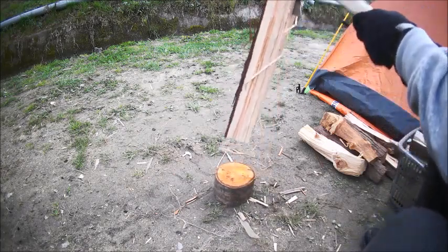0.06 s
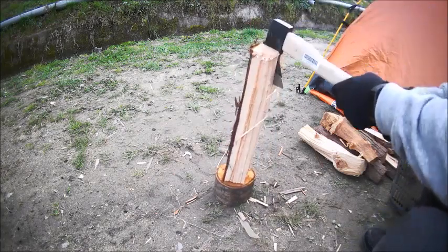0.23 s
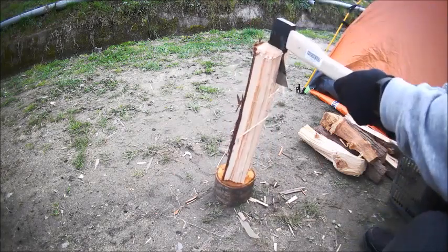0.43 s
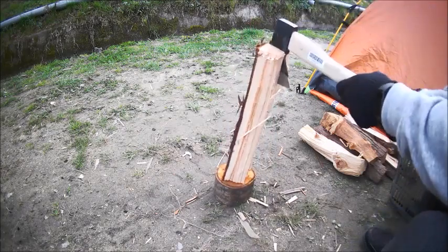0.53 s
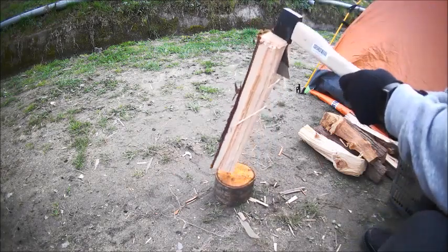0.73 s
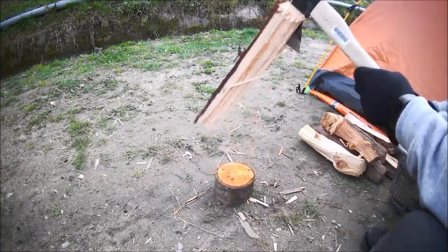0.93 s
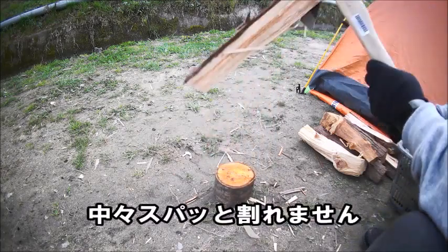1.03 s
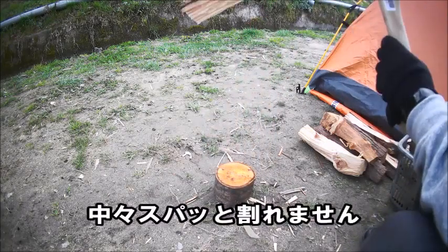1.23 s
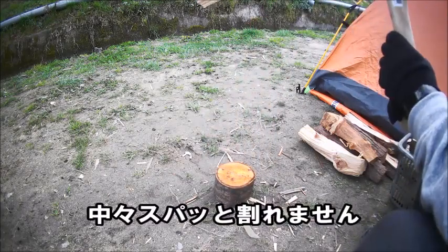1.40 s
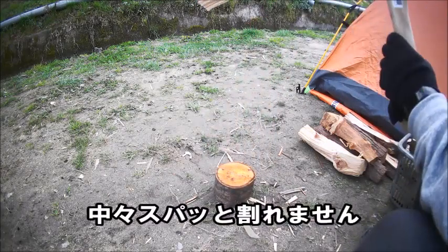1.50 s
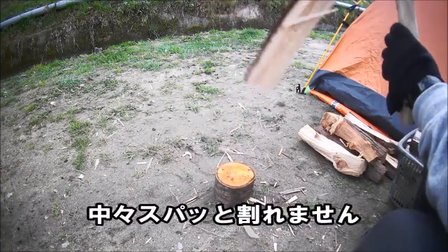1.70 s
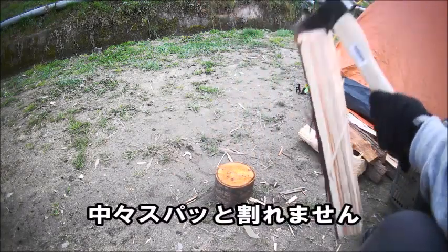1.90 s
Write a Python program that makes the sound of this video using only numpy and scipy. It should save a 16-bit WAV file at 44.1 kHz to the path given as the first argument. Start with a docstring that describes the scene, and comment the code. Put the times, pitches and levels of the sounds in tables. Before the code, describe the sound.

A log wedged on a hatchet slams once onto a wooden block, a loud dry crack slightly clipping the close microphone, with a short open-air scatter; later faint ticks, cloth rustles and a tiny squeak over soft hush.

```python
"""A log with a hatchet stuck in it is slammed once on a wooden block, close enough to clip the microphone
input. Brief contacts excite dying sines of wood and steel, and fibres splinter in a burst of shaped noise. Tent
and trees of an open campsite scatter the blow back as random reflections that die away. Air whistles faintly
before the blow; wood ticks, rustles of ringing clicks and stick-slip creaks of the wedged blade lie over a soft
outdoor hush of drifting noise."""
import sys
import numpy as np
from scipy import signal
from scipy.fft import rfft, irfft
from scipy.io import wavfile
from scipy.ndimage import uniform_filter1d

SR = 44100
rng = np.random.default_rng(int(sys.argv[2]) if len(sys.argv) > 2 else 0)


def output_pcm(signal):
    """Save a mono or channel-first signal as 16-bit PCM at the path in sys.argv[1].

    Samples are clipped to [-1, 1] before scaling.
    """
    pcm = np.clip(np.atleast_2d(signal).T, -1, 1) * 32767
    wavfile.write(sys.argv[1], SR, np.round(pcm).astype(np.int16))


def voltage_ratio(decibels):
    """Convert decibels (scalar or array-like) to amplitude ratios, 20 dB per decade."""
    exponent = np.asarray(decibels, float) / 20
    return 10 ** exponent


N = 85995  # length in samples

# Contacts within the blow; short ones reach the high modes.
# Each row: start in seconds, push (pulse area) in dB, contact time in ms.
BLOW_CONTACTS = [(.2166, -4, .9), (.2181, 3, 0.21), (.2196, -1.5, .12), (.2204, -6.5, 0.09)]


def evened(x):
    """Scales to rms 1."""
    return x / np.sqrt(np.mean(x ** 2) + 1e-20)


def read(points, hz):
    """Reads a spectrum table on a log frequency axis."""
    f, value = np.transpose(points)
    return np.interp(np.log(hz + 1), np.log(f + 1), value)


def add(mix, s, sound):
    """Mixes a sound in at a time in seconds, cut off at the end of the mix."""
    part = mix[round(s * SR):][:len(sound)]
    part += sound[:len(part)]


def ring(modes):
    """Sum of dying sines, one for each mode of a struck body."""
    t = np.arange(SR // 2) / SR
    return sum(voltage_ratio(db - 60 * t / t60) * np.sin(2 * np.pi * hz * t) for hz, db, t60 in modes)


def resonate(x, hz, width_hz):
    """A two-pole resonance of gain 1 at its peak."""
    return signal.lfilter(*signal.iirpeak(min(hz, SR / 2.2), hz / width_hz, SR), x)


def contact_force():
    """The log lands, then the blade drives in from the other end: the first push has the opposite sign."""
    t, force = np.arange(N) / SR, np.zeros(N)
    for k, (s, db, ms) in enumerate(BLOW_CONTACTS):
        u = np.clip((t - s) * 1000 / ms, 0, 1)
        pulse = np.sin(np.pi * u) ** 2
        direction = 1 if k else -1
        force += direction * voltage_ratio(db) * pulse / pulse.sum()
    return force


def splinter():
    """Tearing fibres: shaped noise that swells quickly and dies away."""
    # Spectrum of the tearing. Each row: frequency in Hz, relative level in dB.
    tearing = [(1500, -11), (3000, 1.5), (6000, -6), (9000, 1), (12000, -10.5), (16000, -27.5)]
    level_db, rise_s, t60_s = -15, .0018, .013
    t = np.arange(2048) / SR
    spectrum = rfft(rng.standard_normal(2048)) * voltage_ratio(read(tearing, np.fft.rfftfreq(2048, 1 / SR)))
    hiss = evened(irfft(spectrum))
    return hiss * np.minimum(t / rise_s, 1) ** 2 * voltage_ratio(level_db - 60 * t / t60_s)


def blow():
    """The contact force rings the modes of wood and steel, and fibres splinter."""
    # Modes of the log. Each row: frequency in Hz, relative level in dB, t60 in seconds before the choke.
    wood_modes = [(245, -19, .07), (415, -10, 0.034), (620, -14, .025), (780, -8, .03), (1365.3, 2, 0.015),
                  (1963, -15.5, .018), (2292, -5.5, 0.018), (2712.4, -0.5, 0.014), (3450, 1.5, 0.011),
                  (3682, -3.5, .018), (4830, -17, 0.013), (6500, -20, .01), (7000, -12, 0.011),
                  (8600, -13, 0.015), (11100, -11, .008)]
    # Modes of the hatchet head. Each row: frequency in Hz, level in dB, t60 in seconds.
    steel_modes = [(4994, -29, .11), (8790, -43, .17)]
    wood_db, splinter_s = -0.5, .2172
    choke_s, choke_db, choke_length_s = .2214, -7, .0012
    t, force = np.arange(N) / SR, contact_force()
    # the log seats on the block and its ring is damped
    choke = np.clip((t - choke_s) / choke_length_s, 0, 1)
    wood = signal.oaconvolve(force, ring(wood_modes))[:N] * voltage_ratio(wood_db + choke_db * choke)
    # a small log radiates little below 190 Hz
    wood = signal.lfilter(*signal.butter(2, 190, "high", fs=SR), wood)
    steel = signal.oaconvolve(force, ring(steel_modes))[:N]
    out = wood + steel
    add(out, splinter_s, splinter())
    return out


def sideways_blow(chop):
    """What leaves sideways towards tent and trees: a plain crack with a little of the ring."""
    ring_db, crack_db = -22, 22
    sideways = voltage_ratio(ring_db) * chop
    add(sideways, BLOW_CONTACTS[1][0], voltage_ratio(crack_db) * np.ones(1))  # a single-sample impulse
    return sideways


def surroundings(x):
    """Random reflections whose strength follows delay and whose spectrum's edges dull with distance."""
    # Strength of the scattered sound. Each row: delay in seconds, level in dB.
    strength = [(.006, -33), (0.013, -32), (0.025, -28), (0.034, -28), (0.045, -36), (.068, -50),
                (.085, -45), (.1, -47), (.11, -55), (.128, -49), (.15, -54), (.185, -61), (.212, -58),
                (.23, -64), (.27, -69), (0.359, -84)]
    # Change of its spectrum with delay. Each row: frequency in Hz, slope in dB per second.
    dulling = [(200, -40), (1000, -8.5), (2500, 10), (5000, -10), (8000, -10), (11000, -40)]
    # Its spectrum at no delay. Each row: frequency in Hz, relative level in dB.
    tone = [(100, -28), (350, -11), (700, -8), (1400, -2), (2700, -7), (4300, -16), (7500, -27),
            (9500, -34), (12000, -56)]
    taps = np.zeros(SR // 2)
    slots = np.arange(0, len(taps) - 20, 20)
    # one reflection of random sign somewhere in each slot of 20 samples
    taps[slots + rng.integers(0, 20, len(slots))] = rng.choice([-1., 1.], len(slots))
    hz, t, z = signal.stft(taps, SR, nperseg=128)
    z = z * voltage_ratio(read(tone, hz)[:, None] + read(dulling, hz)[:, None] * t)
    tail = signal.istft(z, SR, nperseg=128)[1][:len(taps)]
    s, db = np.transpose(strength)
    fade = voltage_ratio(np.interp(np.arange(len(taps)) / SR, s, db, -120, -120))
    return signal.oaconvolve(x, tail * fade)[:N]


def creak(start, length, db, first_hz, last_hz):
    """The blade in the split slips fast: a gliding tone with overtones, friction hiss and a short ring."""
    # Level in dB of each harmonic of the slip, from the fundamental up.
    harmonic_db = [-5, -18, -42, -30]
    ring_db, ring_width_hz, hiss_db, hiss_hz = -10, 80, -19, 5500
    u = np.minimum(np.arange(2000) / SR / length, 1)
    turn = 2 * np.pi * np.cumsum(first_hz + (last_hz - first_hz) * u) / SR
    slip = sum(voltage_ratio(h) * np.sin((k + 1) * turn) for k, h in enumerate(harmonic_db))
    hiss = resonate(rng.standard_normal(2000), hiss_hz, hiss_hz)
    hiss = resonate(hiss, hiss_hz, hiss_hz) * voltage_ratio(hiss_db)
    stroke = np.sin(np.pi * u ** .55) ** 1.5  # peaks before the middle
    sound = (slip + hiss) * voltage_ratio(db) * stroke
    return start, sound + voltage_ratio(ring_db) * resonate(sound, last_hz, ring_width_hz)


def tick(s, db, hz, width_hz, t60, noisy):
    """One small knock of wood: a dying tone blended with a puff of noise around it."""
    snap_db = 16  # push of the first sample, against noise of rms 1
    t, noisy = np.arange(3000) / SR, np.clip(noisy, 0, 1)
    push = rng.standard_normal(len(t)) + voltage_ratio(snap_db) * (t == 0)
    puff = evened(resonate(resonate(push, hz, width_hz), hz, width_hz)) / 2
    tone = np.sin(2 * np.pi * hz * t)
    return s, voltage_ratio(db - 60 * t / t60) * ((1 - noisy) * tone + noisy * puff)


def rustle(start, length, db, low_hz, high_hz):
    """Uneven clicks, each ringing one of several small resonances, under a soft stroke."""
    # Level in dB of each grain resonance, from lowest to highest.
    grain_level_db = [-1, -0.5, -0.5, -1.5, -2.5, -2.5, -4.5, -5.5]
    clicks_per_s, uneven_db, width_hz = 5000, 4, 260
    draw, t = rng.random((3, 4000)), np.arange(4000) / SR
    place = np.linspace(0, 1, len(grain_level_db))
    which = rng.integers(0, len(place), 4000)
    happens, sign = draw[0] < clicks_per_s / SR, np.sign(draw[1] - .5)
    clicks = happens * sign * voltage_ratio(-uneven_db * np.log(draw[2] + .01))
    hz = low_hz * (high_hz / low_hz) ** place * rng.uniform(.94, 0.98, len(place))
    grains = sum(voltage_ratio(grain_level_db[k]) * resonate(clicks * (which == k), f, width_hz)
                 for k, f in enumerate(hz))
    stroke = np.sin(np.pi * np.minimum(t / length, 1)) ** 1.1
    return start, voltage_ratio(db) * evened(grains) * stroke


def swing():
    """Air whistles faintly past the falling log: noise in a narrow resonance that climbs."""
    # Each row: time in seconds, frequency in Hz, rms level in dB.
    whistle = [(.07, 1233, -83), (.11, 1450, -70), (.15, 1540, -69), (.19, 1594, -68), (.212, 1617, -79.5)]
    width_hz = 22
    s, hz, db = np.transpose(whistle)
    t, r = np.arange(N) / SR, np.exp(-np.pi * width_hz / SR)
    turn = np.exp(2j * np.pi * np.cumsum(np.interp(t, s, hz)) / SR)
    noise = rng.standard_normal(N) + 1j * rng.standard_normal(N)
    slow = signal.lfilter([1 - r], [1, -r], noise)
    return evened((turn * slow).real) * voltage_ratio(np.interp(t, s, db, -120, -120))


def hush():
    """Distant outdoor noise with drifting patches, a slow swell and faint wavering tones."""
    # Spectrum of the outdoor noise. Each row: frequency in Hz, relative level in dB per Hz.
    outdoor = [(18, -48.5), (30, -15), (134, -2), (247, -4.5), (362, -2.5), (455, -5), (999, -8.5),
               (2980, -23), (3300, -27), (12000, -31.5), (13000, -35.5)]
    # Faint tones, made of narrow noise. Each row: frequency in Hz, rms level in dB, width in Hz.
    faint_tones = [(201, -74, 9.4), (5420, -92.5, 39)]
    level_db, patch_db, swell_db = -60.5, 1.6, .4
    frames, hz = N // 256 + 5, np.fft.rfftfreq(1024, 1 / SR)
    a, b, patches = rng.standard_normal((frames, 513, 3)).T
    patches = uniform_filter1d(patches, size=10, axis=0)  # across frequency
    patches = evened(uniform_filter1d(patches, size=12, axis=1))  # across time
    swell = evened(uniform_filter1d(rng.standard_normal(frames), size=30))
    z = (a + 1j * b) * voltage_ratio(read(outdoor, hz)[:, None] + patch_db * patches + swell_db * swell)
    out = voltage_ratio(level_db) * evened(signal.istft(z, nperseg=1024, noverlap=768)[1][:N])
    return out + sum(voltage_ratio(db) * evened(resonate(rng.standard_normal(N), f, w)) for f, db, w in faint_tones)


def scene():
    """All sources at one close microphone."""
    # Creaks of the blade. Each row: start in seconds, length in seconds, level in dB, first Hz, last Hz.
    creaks = [(1.7799, 0.0045, -21, 3330, 3450), (1.7819, 0.0082, -21, 2487, 2270),
              (1.7857, 0.00403, -27, 3665, 4050), (1.8014, 0.0043, -45.5, 2400, 2390)]
    # Ticks of wood. Each row: start in seconds, level in dB, ring in Hz,
    # width of the puff's resonances in Hz, t60 in seconds, share of noise from 0 to 1.
    ticks = [(0.1825, -42, 1550, 5000, .035, 0.36), (.386, -56.5, 6500, 3980, 0.036, 0.71),
             (0.797, -52.5, 5500, 6000, 0.01, .9), (.917, -55.5, 2980, 4990, .02, 0.91),
             (1.0486, -40, 1900, 2800, .016, .9), (1.6032, -53, 4800, 6000, 0.044, .9),
             (1.7687, -39.5, 1342, 2020, 0.022, 0.61), (1.8352, -50, 5000, 7000, .045, 0.98)]
    # Rustles and scrapes. Each row: start in seconds, length in seconds,
    # rms level in dB before the stroke, nominal lowest and highest resonance in Hz.
    rustles = [(0.191, 0.015, -61.5, 2530, 9000), (.48, .032, -56, 2200, 11500),
               (0.621, 0.049, -72.5, 2500, 8010), (1.216, 0.026, -77, 2490, 4008),
               (1.641, 0.069, -77, 3944, 6000), (1.68, .064, -60, 2800, 9560),
               (1.762, 0.023, -60, 796, 5000), (1.791, 0.039, -66, 2010, 9900)]
    chop, small = blow(), swing()
    for source, rows in ((creak, creaks), (tick, ticks), (rustle, rustles)):
        for row in rows:
            add(small, *source(*row))
    scattered = surroundings(sideways_blow(chop))
    return (chop + scattered + small + hush())[None]


def low_pass(x):
    """Removes everything above the highest recorded frequency."""
    return signal.sosfilt(signal.butter(12, 13290, fs=SR, output="sos"), x)


def record(dry):
    """The microphone drops deep bass and top treble, and its input clips at full scale."""
    low_hz, high_hz, ceiling = 85, 13500, 1.0
    mic = signal.lfilter(*signal.butter(1, low_hz, "high", fs=SR), dry)
    mic = signal.lfilter(*signal.butter(2, high_hz, fs=SR), mic)
    return low_pass(np.clip(mic, -ceiling, ceiling))


dry = scene()
out = record(dry)
output_pcm(out)
```